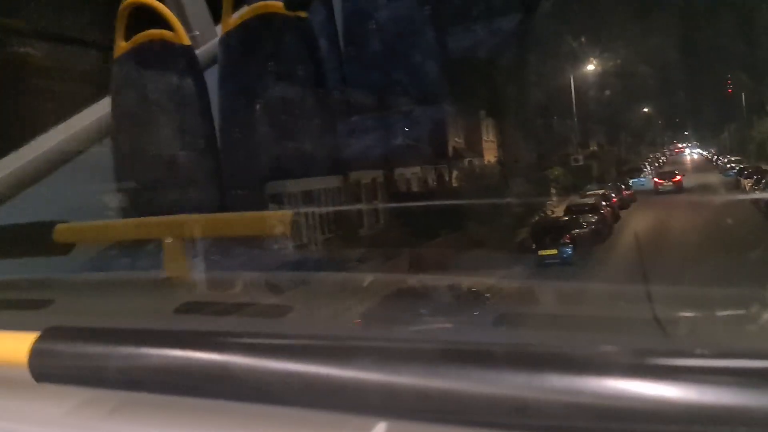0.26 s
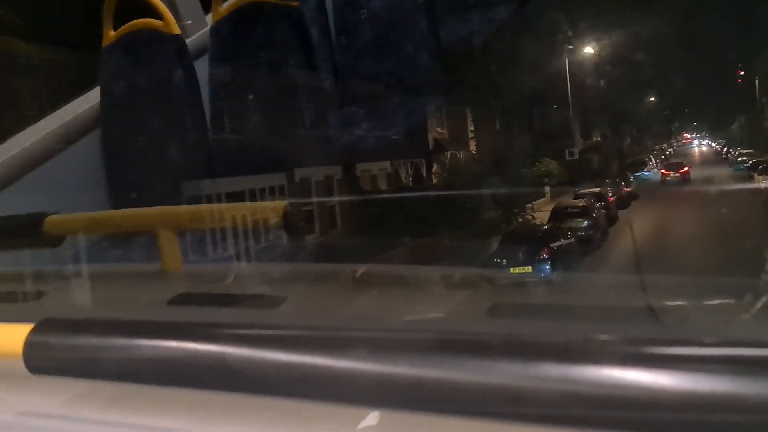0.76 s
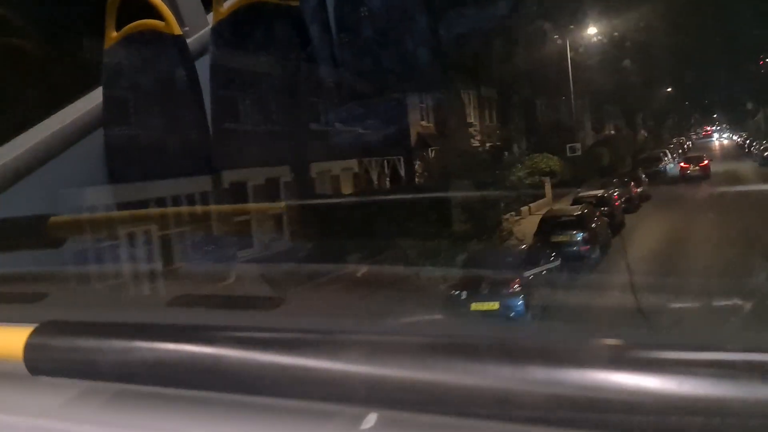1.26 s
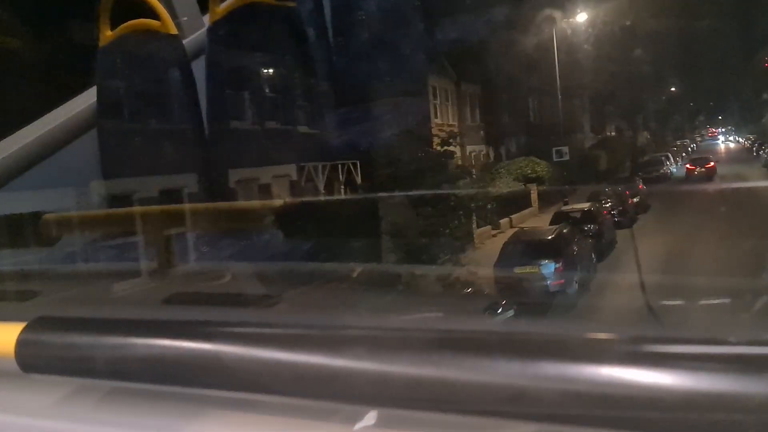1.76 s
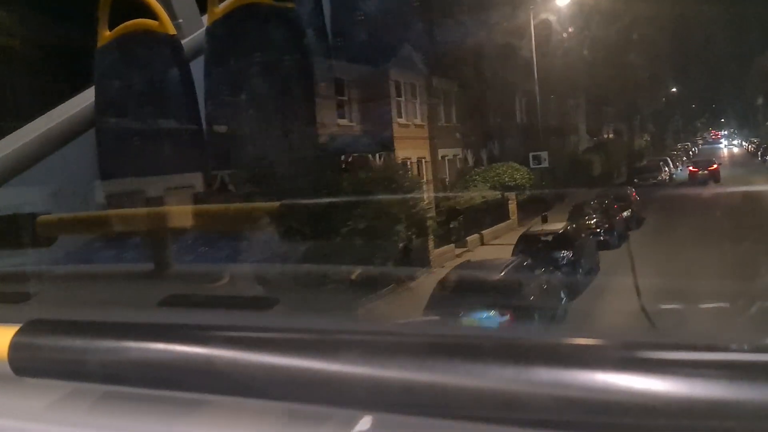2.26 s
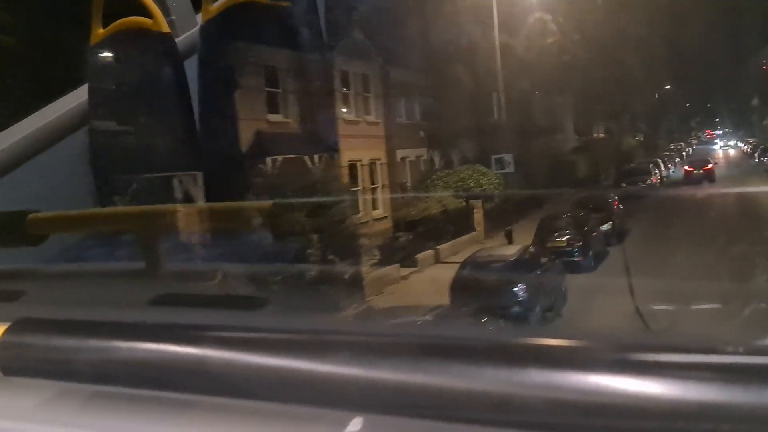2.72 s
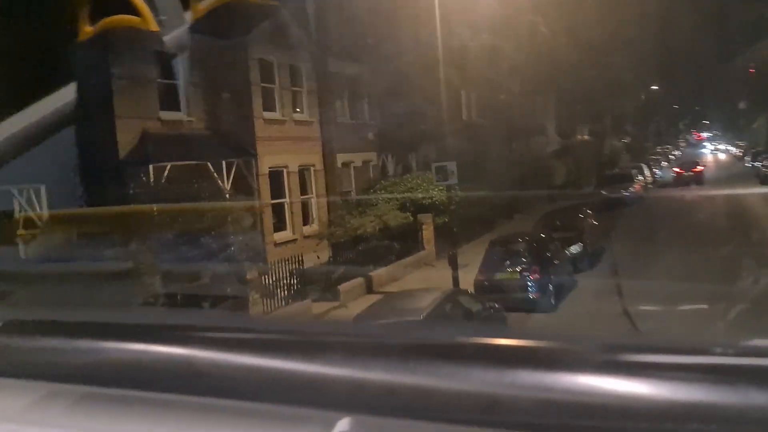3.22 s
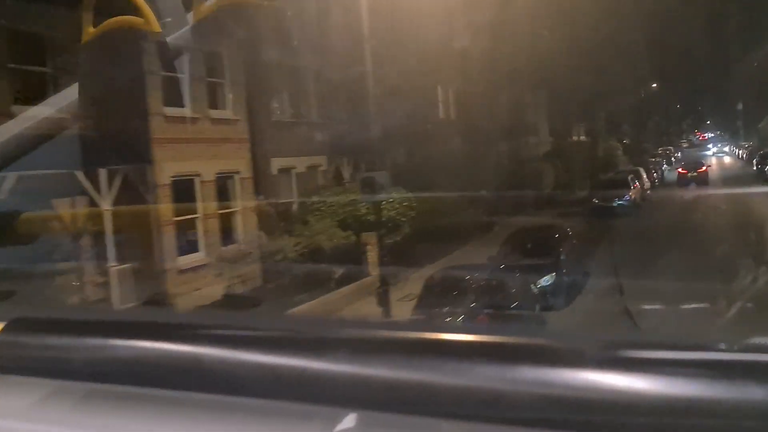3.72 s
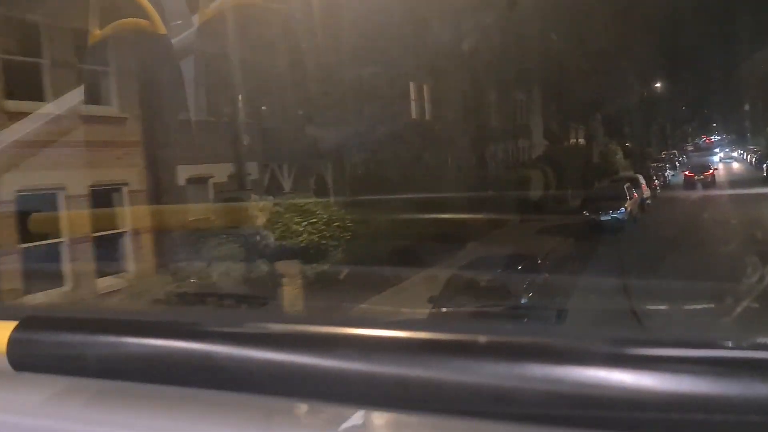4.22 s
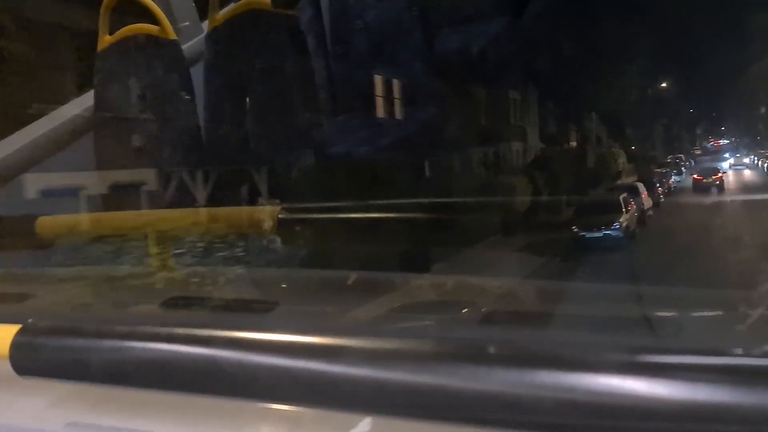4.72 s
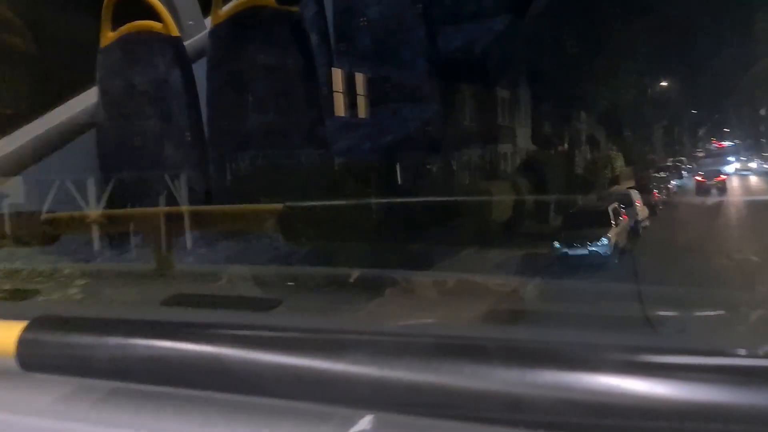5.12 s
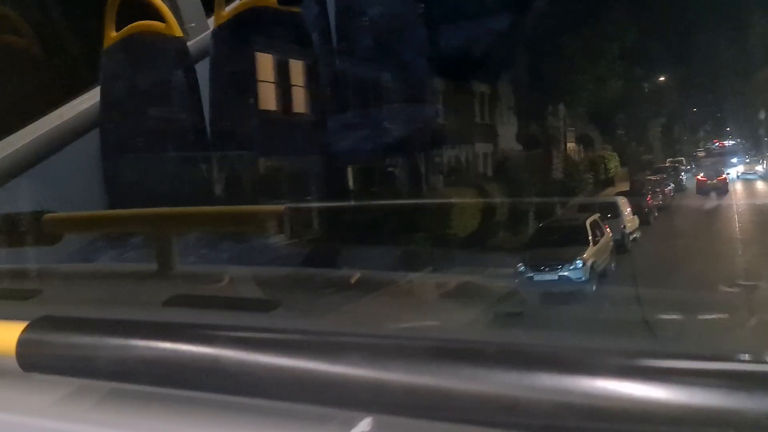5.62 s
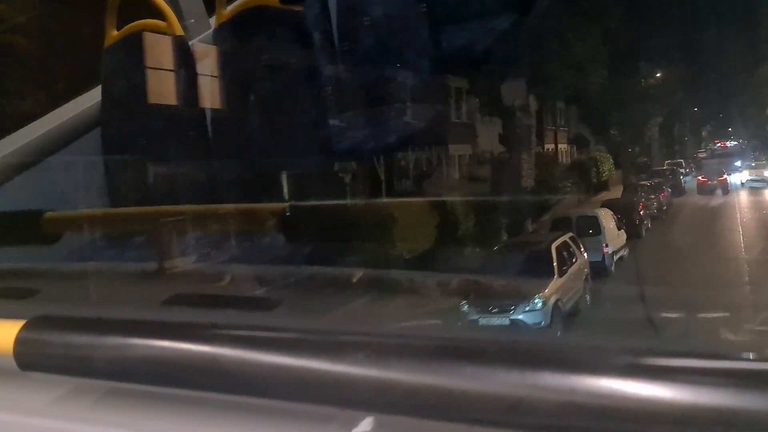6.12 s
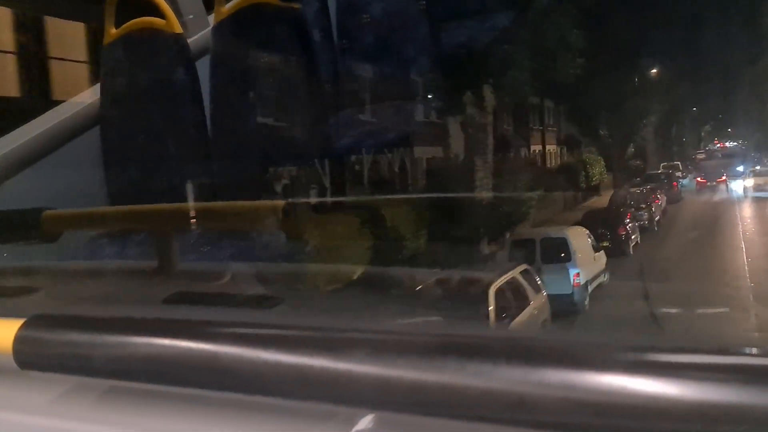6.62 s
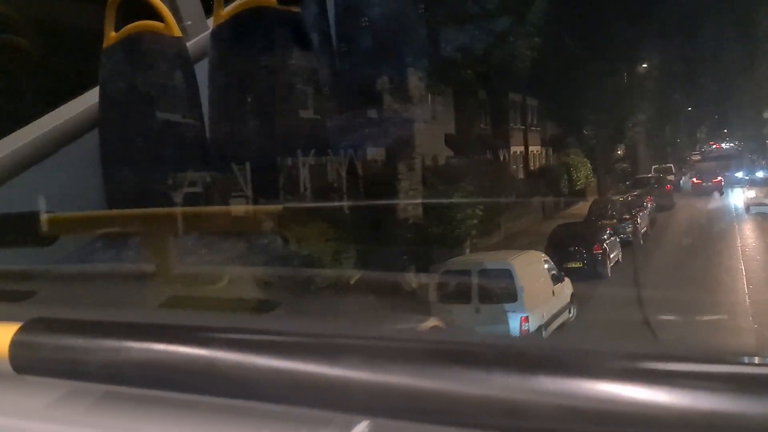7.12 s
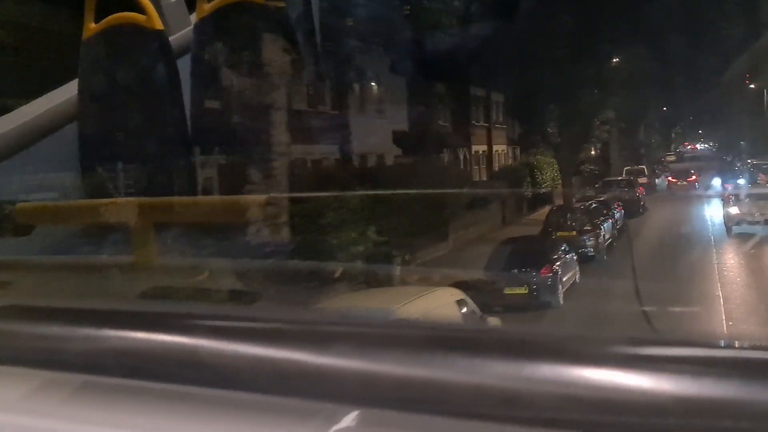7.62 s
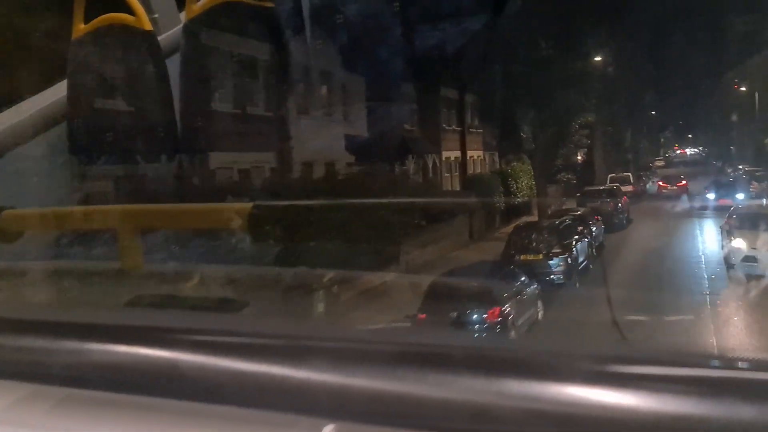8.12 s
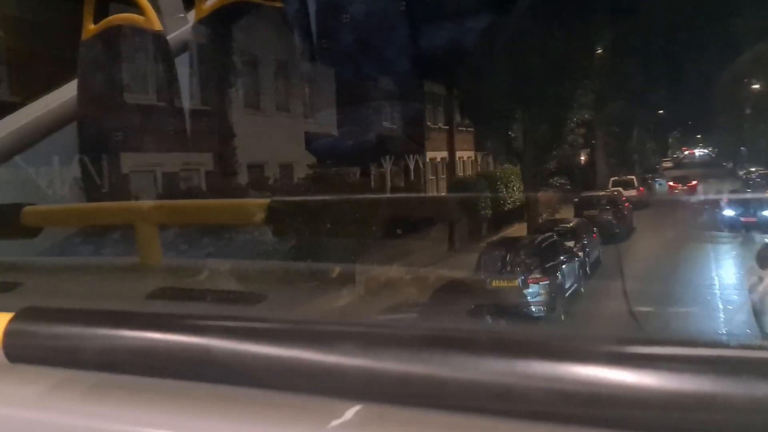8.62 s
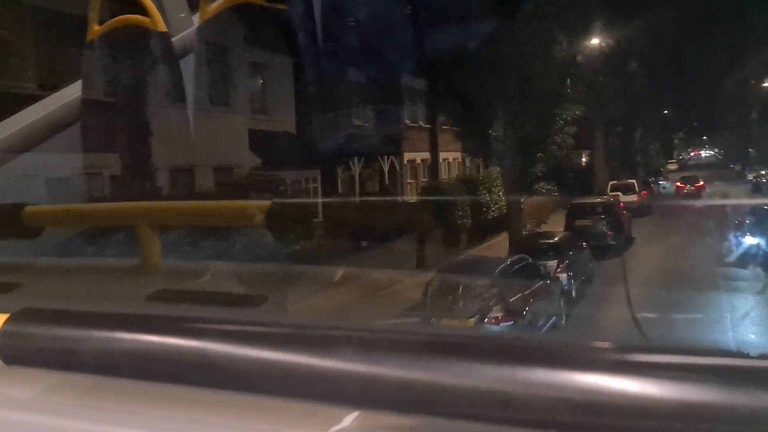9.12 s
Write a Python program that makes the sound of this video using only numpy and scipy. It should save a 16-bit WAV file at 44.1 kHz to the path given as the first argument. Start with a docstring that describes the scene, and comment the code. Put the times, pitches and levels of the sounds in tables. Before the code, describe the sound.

Heard from the upper deck of a double-decker bus, a diesel engine booms low and steady over tyre rumble and a droning body. The engine note sinks in steps as the revs fall, swelling and easing along the way. A loose panel knocks irregularly at the jolts throughout, while the vents hiss softly with thin whistles and fans hum faintly.

```python
"""A diesel engine booms through the upper deck of a double-decker bus driving along a street.
Its firing note and overtones swell as the revs rise and fall across resonances of the body.
Under it the body drones and tyre rumble rings the cabin air. A loose panel knocks at each jolt.
The vents hiss with a few thin whistles; fans and drive hum faintly."""
import sys
import numpy as np
from scipy import signal
from scipy.fft import rfft, irfft
from scipy.io import wavfile

SR = 44100
rng = np.random.default_rng(int(sys.argv[2]) if len(sys.argv) > 2 else 0)


def transcribe(signal):
    """Save signal, clipped to [-1, 1], as a 16-bit WAV file at the path in sys.argv[1]."""
    frames = np.atleast_2d(signal).T
    limited = np.clip(frames, -1, 1)
    pcm = np.round(limited * 32767).astype(np.int16)
    wavfile.write(sys.argv[1], SR, pcm)


N = 412776
TIME_S = np.arange(N) / SR
BINS_HZ = np.fft.rfftfreq(N, 1 / SR)

# engine speed (time [s], firing rate [Hz])
FIRING_HZ = [(0, 50.2), (.2, 49.96), (.4, 46.9), (.95, 49.45), (1.4, 48.46), (1.85, 45.3), (2.05, 41.67),
             (2.75, 42.43), (3.3, 31.0), (3.7, 29.8), (4.0, 30.8), (4.45, 36.1), (5.3, 37.32), (6.15, 36.8),
             (6.5, 29.64), (7.05, 29.5), (7.6, 27.6), (9.36, 29.45)]
# engine load, easing then picking up (time [s], gain [dB])
LOAD_DB = [(0, 0.5), (7.35, 0), (7.5, -1), (7.8, 1), (8.05, -8), (8.95, -6), (9.15, 1.5)]
# body response to the firing note, two peaks (firing rate [Hz], level [dB])
BOOM_DB = [(27, -18.5), (29, -15), (30.6, -15), (32.5, -19.5), (35, -25.5), (37.3, -31), (39.5, -46),
           (42, -22.5), (45.3, -16.5), (48, -14), (51, -14.5)]
# body response to the overtones (frequency [Hz], level [dB])
OVERTONE_DB = [(58, -34.5), (75, -46), (99, -34.5), (112, -41.5), (130, -46.5), (148, -43), (158, -49.5),
               (168, -37.5), (185, -58.5), (222, -56), (248, -56), (280, -61), (400, -64)]
# body drone (time [s], level [dB])
DRONE_DB = [(0, -27), (.4, -25.5), (1.45, -38), (1.85, -25.5), (2.3, -27), (2.55, -33.5), (2.95, -23),
            (3.8, -27.5), (5.1, -23), (6.6, -26), (7.7, -22), (8.95, -26.5), (9.25, -21)]
# road roughness (time [s], relative level [dB])
ROAD_DB = [(0, -32.6), (1.1, -31.5), (1.7, -34.8), (2.4, -34.3), (2.85, -33), (4.2, -36), (5.6, -35),
           (7.1, -32.5), (7.9, -34.3), (9.36, -32)]
# rumble spectrum (frequency [Hz], relative density [dB])
RUMBLE_DB = [(12, -21), (20, 9.5), (28, 11.5), (48, 2), (70, 3), (82, 0), (100, -7), (130, -12),
             (200, -38.5), (280, -29), (380, -27), (470, -34), (900, -33.5), (2000, -44), (5000, -78)]
# cabin air resonances (frequency [Hz], width [Hz], level [dB])
CABIN_MODES = [(156.6, 4.4, -45), (173, 18, -42), (217.3, 27, -47), (254, 19, -55), (318.4, 23, -53),
               (355.3, 6.7, -58.5), (534, 6.9, -72), (597, 37, -70)]
# panel knocks (time [s], strength [dB], contact sharpness [dB])
KNOCK_EVENTS = [(0.0782, -5.5, -5), (0.2389, 0, 1), (0.313, -6.5, 6), (0.672, -3.5, 3), (0.7143, -4.5, -4),
                (1.042, -4, 1), (1.1232, -9, -5), (1.3703, -3, 2), (2.835, -3, -18), (3.049, -5.5, 3),
                (3.088, -9, 0), (3.1363, -6.5, 3), (3.2866, -3, -1), (3.5077, -3.5, 1), (3.6304, -3, -2),
                (4.7651, -1, -2), (5.1809, -5, -1), (5.4153, -2, 0), (5.6989, -5.5, -3), (5.9693, 0.5, 0.5),
                (6.322, -7, -12), (6.574, -8, 1), (6.6411, -9, 2), (7.2799, 1, 0.5), (8.0731, -3, -1),
                (8.4198, -2, -2), (8.6796, -5, -2), (8.7841, -1.5, 0)]
# contact spectrum (frequency [Hz], relative density [dB])
CLACK_DB = [(100, 4), (300, -7), (500, 3.5), (800, 5), (1100, -2), (1500, 1.5), (2200, 2.5), (4000, -7),
            (5200, -4.5), (7000, -10.5), (8500, -17.5), (12000, -14), (15500, -19)]
# panel modes (frequency [Hz], level [dB])
PANEL_MODES = [(190, -33), (248, -35), (345, -35), (420, -39), (690, -45), (760, -45), (875, -45),
               (1270, -46), (1440, -41), (1590, -45), (1850, -43), (2030, -43), (2200, -45), (3160, -45)]
# small metal fittings on the panel (frequency [Hz], level [dB])
FITTING_MODES = [(5100, -50), (5420, -48), (6950, -49), (7200, -51)]
# vent airflow (time [s], relative level [dB])
AIRFLOW_DB = [(0.0, -48), (2.37, -49.5), (3.73, -48.5), (4.4, -49), (5.97, -47.5), (9.36, -47)]
# vent hiss spectrum (frequency [Hz], relative density [dB])
HISS_DB = [(200, 1.5), (600, 2.5), (1300, -2.5), (1800, 0.5), (2300, 0), (3100, 2.5), (3600, 0.5),
           (4500, -1.5), (5400, -3), (5850, -6), (6500, -1.5), (7200, -5.5), (8300, -17), (11500, -17.5),
           (14700, -22), (15600, -27)]
# vent whistles (frequency [Hz], width [Hz], relative level [dB])
WHISTLE_MODES = [(1500, 10, -74.5), (3022, 10, -63), (3416, 10, -64), (3492, 18, -62), (3525, 56, -60),
                 (3918, 22, -65)]
# fan and drive tones (frequency [Hz], level [dB], pitch wobble [ratio])
HUM_TONES = [(323, -53, .012), (567, -66, .004), (823, -62.5, .0007), (2429, -69, .0004),
             (3493, -63, .0012)]
# stereo likeness (frequency [Hz], left-right correlation [-1..1])
CORRELATION = [(60, 0.99), (120, 0.97), (200, 0.97), (330, 0.72), (550, 0.63), (900, 0.11), (3000, -0.092),
               (12000, -0.007)]
# stereo balance (frequency [Hz], left minus right [dB])
BALANCE_DB = [(80, -0.1), (170, 1), (260, -5), (340, 1.5), (520, 5), (720, -2), (1200, -1), (1900, -4),
              (3400, -3), (5200, 1), (6600, -4.5), (7800, 3.5), (9500, -4.5), (15000, -8)]


def engine(throb=0.09, unevenness=0.4, harmonics=8):
    """Firing note and overtones swell as the revs carry them across body resonances."""
    firing_hz = curve(FIRING_HZ)
    phase = 2 * np.pi * np.cumsum(firing_hz) / SR
    boom = amp(lookup(BOOM_DB, firing_hz) + curve(LOAD_DB))
    sound = boom * (1 + throb * wander(2.4)) * np.sin(phase)
    for order in range(2, harmonics + 1):
        gain = amp(lookup(OVERTONE_DB, order * firing_hz)) * (1 + unevenness * wander(4.0))
        sound += gain * np.sin(order * phase + 2 * np.pi * rng.random())
    return np.sqrt(2) * sound


def body_drone(hz=84.34, sway_db=1.1):
    """A deep body resonance, shaken in level and phase by the ride."""
    phase = 2 * np.pi * hz * TIME_S + .3 * wander(3)
    shake = 1 + .18 * wander(8)
    level_db = curve(DRONE_DB) + sway_db * wander(5.6)
    return np.sqrt(2) * amp(level_db) * shake * np.sin(phase)


def road_rumble(rumble_db=-24.5, cabin_db=-0.2, jolt_db=3.5):
    """Tyre rumble comes up through the body, rings the cabin air and swells at each bump."""
    level_db = curve(ROAD_DB) + jolt_db * jolts()
    rumble = amp(rumble_db) * unit_rms(amp(lookup(RUMBLE_DB, BINS_HZ)))
    cabin = amp(cabin_db) * resonances(CABIN_MODES)
    return cabin_noise(rumble + cabin) * amp(level_db - level_db.mean())


def jolts(rise_s=0.013, fade_s=0.035):
    """Bump envelope: a quick rise to each knock, then a slower fade."""
    bumps = np.zeros(N)
    for at_s, db, _ in KNOCK_EVENTS:
        falloff = np.maximum((at_s - TIME_S) / rise_s, (TIME_S - at_s) / fade_s)
        bumps += amp(db) * np.exp(-falloff.clip(0, 20))
    return bumps


def panel_knocks(clack_db=-37, thud_db=-29, treble_hz=4500, right_db=5.0):
    """The loose panel strikes its frame; sharper contacts add treble."""
    t = np.arange(SR // 4) / SR
    hz = np.fft.rfftfreq(len(t), 1 / SR)
    colour = unit_rms(amp(lookup(CLACK_DB, hz)))
    treble = hz ** 2 / (hz ** 2 + treble_hz ** 2)
    pan = pan_gains(lookup(BALANCE_DB, hz) - right_db * (1 - treble))
    fade = np.minimum(1, 2 * (1 - t / t[-1]))
    shared = contact_burst(t)
    out = np.zeros((2, N))
    for at_s, db, sharp_db in KNOCK_EVENTS:
        contact = (shared + contact_burst(t)) / np.sqrt(2)  # half repeats, half is new
        clack = fade * irfft(rfft(contact) * colour * pan * amp(sharp_db * treble), len(t))
        knock = amp(clack_db) * clack + panel_ring(t, sharp_db) + amp(thud_db) * frame_thud(t)
        add(out, at_s, amp(db) * knock)
    return out


def contact_burst(t, t60_s=0.28):
    """Direct contact, reflections off windscreen and roof, then the cabin's tail."""
    direct = 1.8 * np.exp(-t / .003)
    reflections = .6 * np.exp(-((t - .01) / .004) ** 2)
    tail = (1 - np.exp(-t / .005)) * amp(-60 * t / t60_s)
    return (direct + reflections + tail) * rng.standard_normal((2, len(t)))


def panel_ring(t, sharp_db):
    """The damped panel and its longer-ringing fittings, which answer sharp contacts most."""
    panel = ring(t, PANEL_MODES, t60_at_300hz_s=.16)
    fittings = ring(t, FITTING_MODES, t60_at_300hz_s=.5)
    return panel + amp(sharp_db) * fittings


def ring(t, modes, t60_at_300hz_s, rise_s=0.005, scatter_db=2.5):
    """Struck modes, their levels new at each blow; higher ones die sooner."""
    sound = np.zeros((2, len(t)))
    for hz, db in modes:
        t60_s = t60_at_300hz_s * (300 / hz) ** .3
        decay = amp(db + scatter_db * rng.standard_normal() - 60 * t / t60_s)
        sound += decay * np.sin(2 * np.pi * hz * t + stereo_phase(hz))
    return sound * (1 - np.exp(-t / rise_s))


def frame_thud(t, hz=335, delay_s=0.021, width_s=0.0034):
    """The heavier frame answers a moment later with a short hollow thud."""
    pulse = np.exp(-((t - delay_s) / width_s) ** 2)
    return pulse * np.sin(2 * np.pi * hz * t + stereo_phase(hz))


def ventilation(hiss_gain_db=5, flicker_db=0.74, whistle_gain_db=1.1, waver_db=1.3, follow=1.326):
    """Air rushes from the vents; narrow wavering whistles follow its strength."""
    air_db = curve(AIRFLOW_DB)
    hiss = cabin_noise(unit_rms(amp(lookup(HISS_DB, BINS_HZ))))
    hiss *= amp(air_db + hiss_gain_db + flicker_db * wander(9.1))
    whistle_db = whistle_gain_db + follow * (air_db - air_db.mean()) + waver_db * wander(7.3)
    return hiss + cabin_noise(resonances(WHISTLE_MODES)) * amp(whistle_db)


def machine_hums(flutter=0.6):
    """Fans and drive hum on thin, slowly wavering notes."""
    out = np.zeros((2, N))
    for hz, db, wobble in HUM_TONES:
        pitch_hz = hz * (1 + wobble * wander(0.795))
        phase = 2 * np.pi * np.cumsum(pitch_hz) / SR + stereo_phase(hz)
        pan = pan_gains(lookup(BALANCE_DB, hz))
        out += np.sqrt(2) * amp(db) * pan * (1 + flutter * wander(4.3)) * np.sin(phase)
    return out


def cabin_noise(magnitude):
    """Shaped stereo noise: bass alike on both sides, treble diffuse."""
    mid, side = rfft(rng.standard_normal((2, N)))
    correlation = lookup(CORRELATION, BINS_HZ)
    mid *= np.sqrt((1 + correlation) / 2)
    side *= np.sqrt((1 - correlation) / 2)
    pan = pan_gains(lookup(BALANCE_DB, BINS_HZ))
    return irfft(np.array([mid + side, mid - side]) * pan * magnitude, N)


def resonances(modes):
    """Magnitude spectrum of resonances, each with its own total power."""
    power = np.zeros(len(BINS_HZ))
    for hz, width_hz, db in modes:
        bell = 1 / (1 + ((BINS_HZ - hz) / width_hz) ** 2) ** 2
        power += amp(db) ** 2 * bell / bell.mean()
    return np.sqrt(power)


def stereo_phase(hz):
    """Left and right starting phases of a tone."""
    apart_rad = np.arccos(lookup(CORRELATION, hz))
    return 2 * np.pi * rng.random() + np.array([[0], [apart_rad]])


def pan_gains(balance_db):
    """Left and right gains for a balance."""
    return amp(np.outer([.5, -.5], balance_db))


def wander(cutoff_hz):
    """Slow random drift, rms one."""
    return unit_rms(irfft(rfft(rng.standard_normal(N)) / (1 + (BINS_HZ / cutoff_hz) ** 4), N))


def curve(table):
    """A time table, interpolated per sample."""
    return np.interp(TIME_S, *np.transpose(table))


def lookup(table, hz):
    """A frequency table, interpolated on a log axis."""
    table_hz, values = np.transpose(table)
    return np.interp(np.log(hz + 1), np.log(table_hz + 1), values)


def amp(db):
    """Decibels to gain."""
    return 10 ** (np.asarray(db) / 20)


def unit_rms(x):
    """Scales to rms one."""
    return x / np.sqrt(np.mean(x ** 2) + 1e-20)


def add(mix, at_s, sound):
    """Mixes in a stereo sound."""
    part = mix[:, round(at_s * SR):][:, :sound.shape[1]]
    part += sound[:, :part.shape[1]]


def scene():
    """The mix at the front seat."""
    return engine() + body_drone() + road_rumble() + panel_knocks() + ventilation() + machine_hums()


def record(dry):
    """Low cut, then band limit."""
    low_hz, high_hz = 19, 15650
    low_cut = signal.butter(5, low_hz, "highpass", fs=SR, output="sos")
    band_limit = signal.firwin(511, high_hz, window=("kaiser", 9), fs=SR)
    return signal.oaconvolve(signal.sosfilt(low_cut, dry), band_limit[None], "same")


dry = scene()
out = record(dry)
transcribe(out)
```